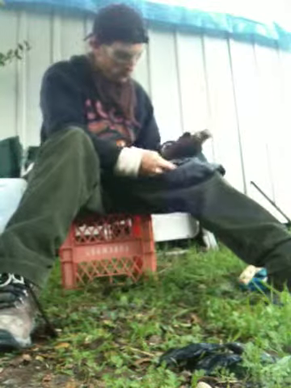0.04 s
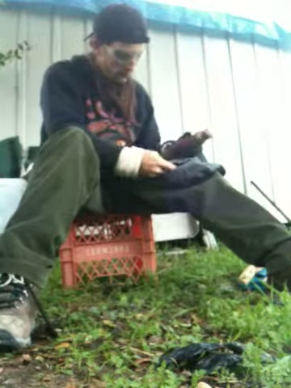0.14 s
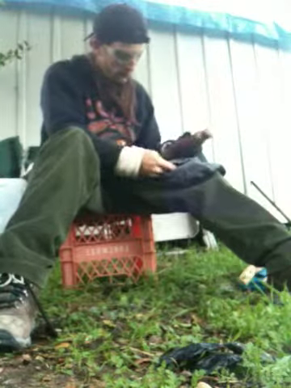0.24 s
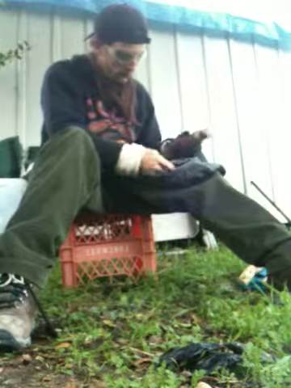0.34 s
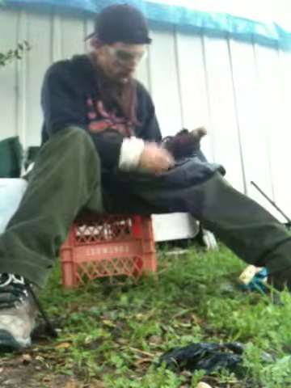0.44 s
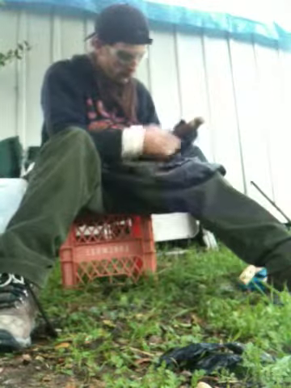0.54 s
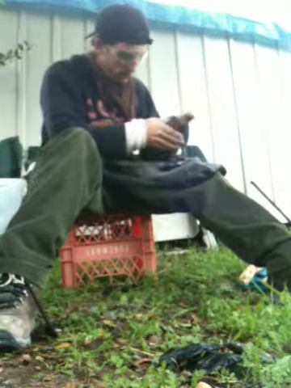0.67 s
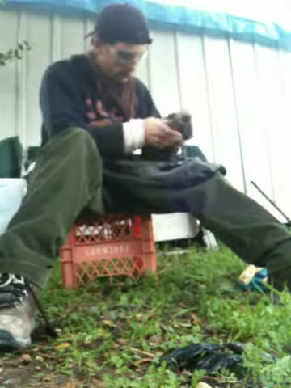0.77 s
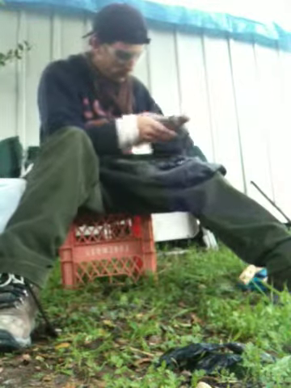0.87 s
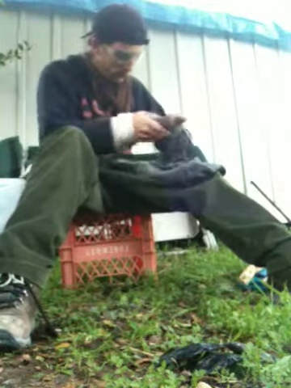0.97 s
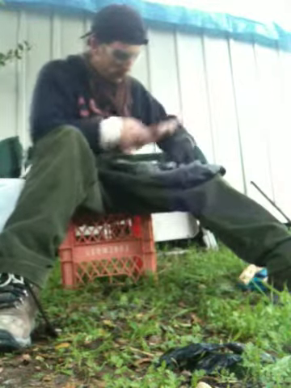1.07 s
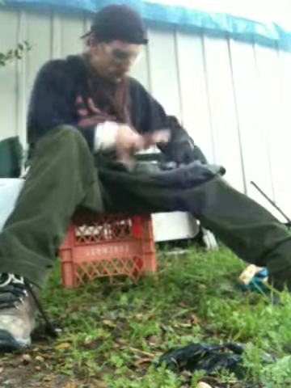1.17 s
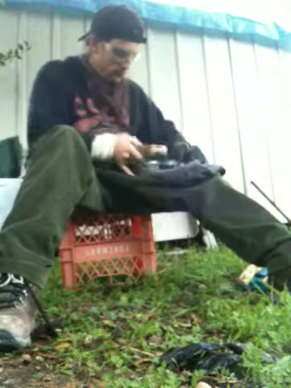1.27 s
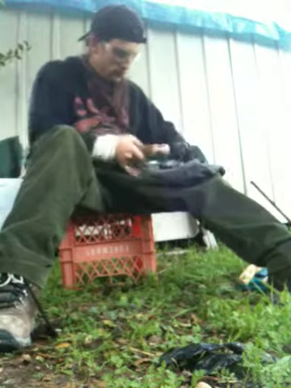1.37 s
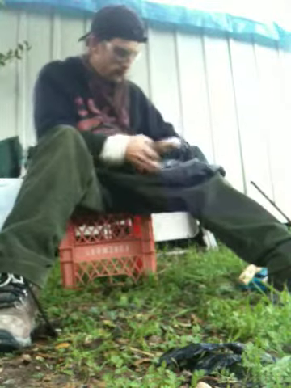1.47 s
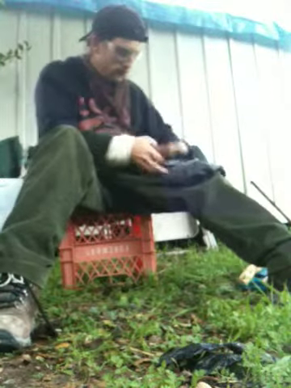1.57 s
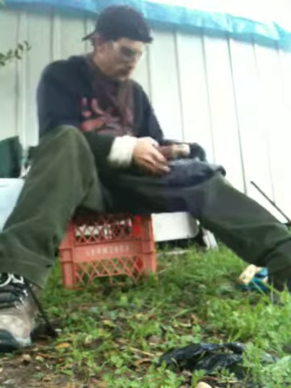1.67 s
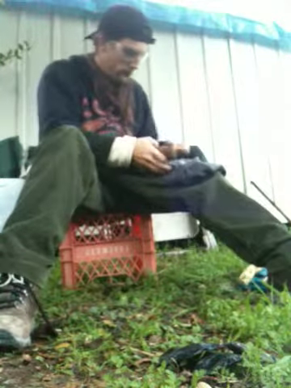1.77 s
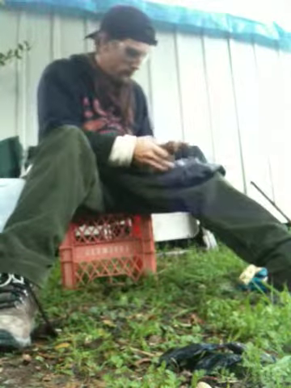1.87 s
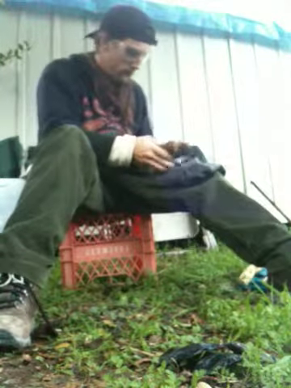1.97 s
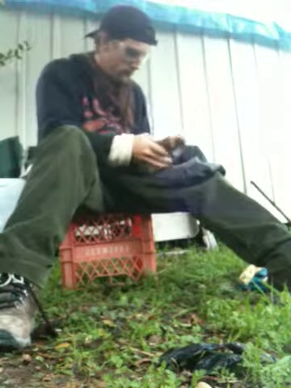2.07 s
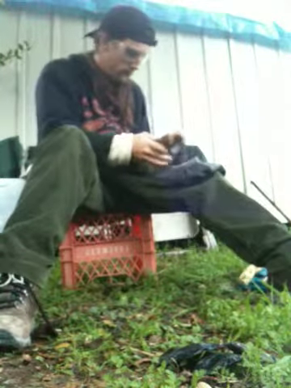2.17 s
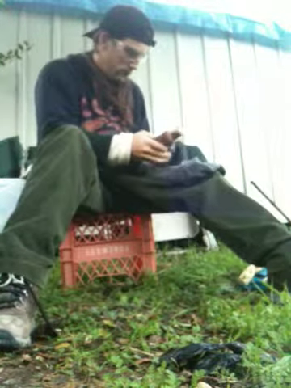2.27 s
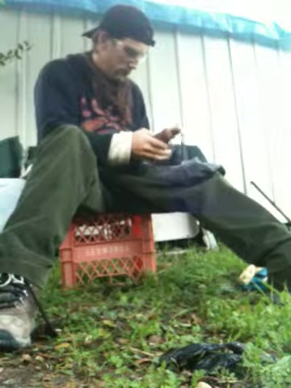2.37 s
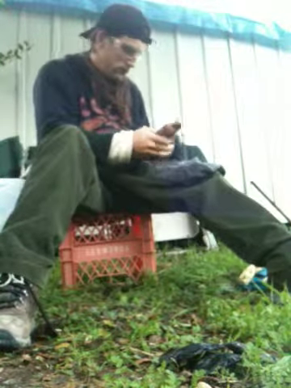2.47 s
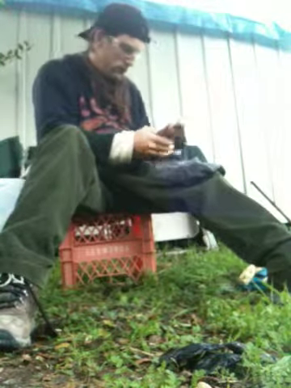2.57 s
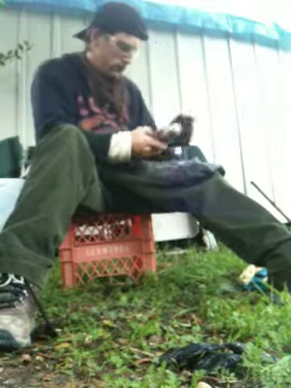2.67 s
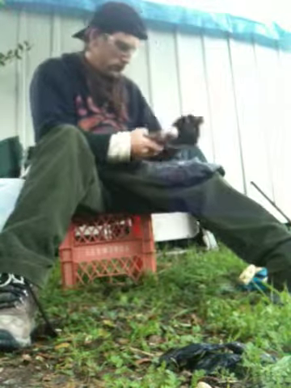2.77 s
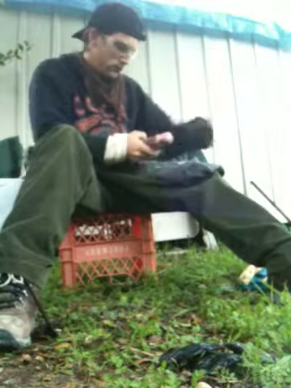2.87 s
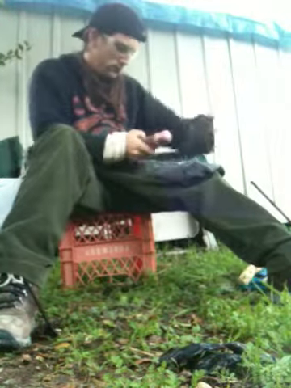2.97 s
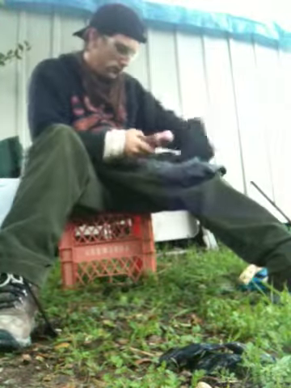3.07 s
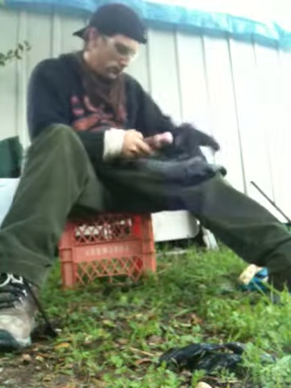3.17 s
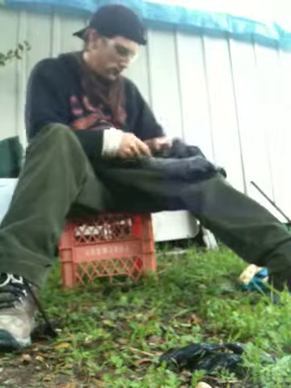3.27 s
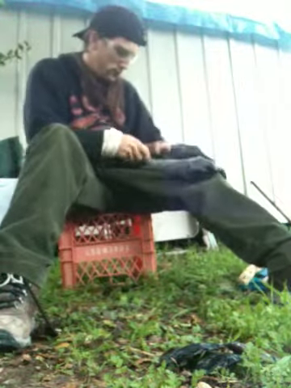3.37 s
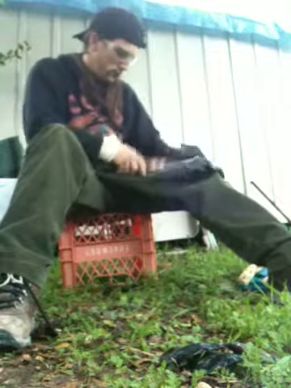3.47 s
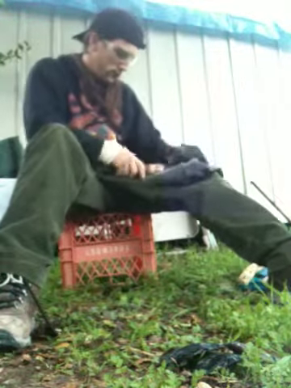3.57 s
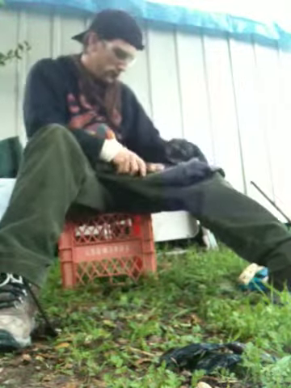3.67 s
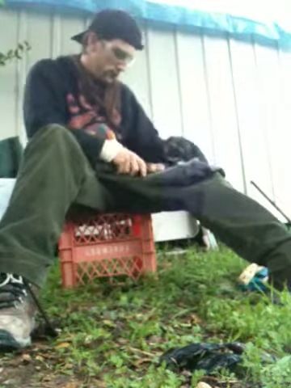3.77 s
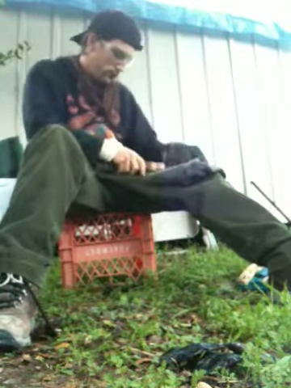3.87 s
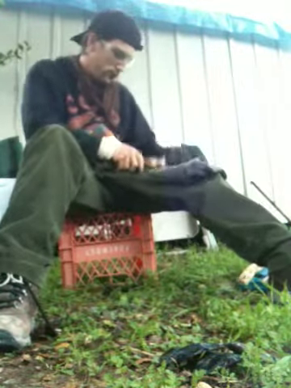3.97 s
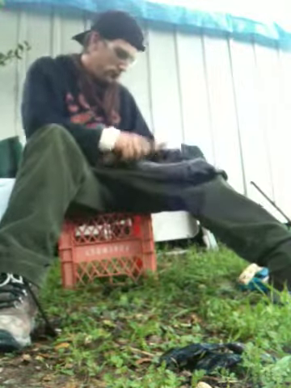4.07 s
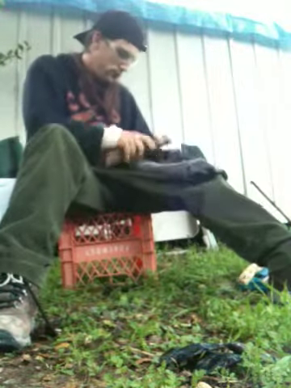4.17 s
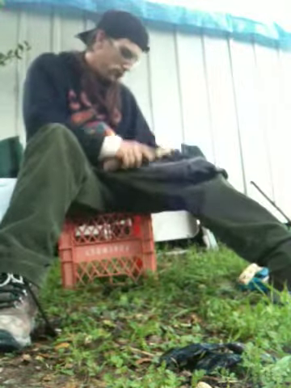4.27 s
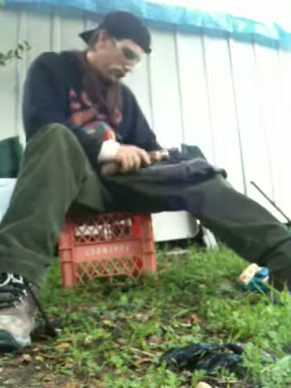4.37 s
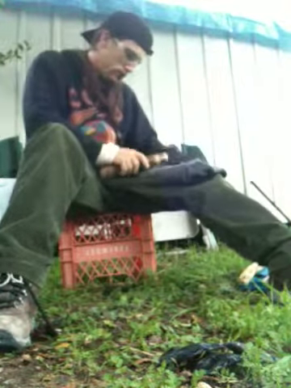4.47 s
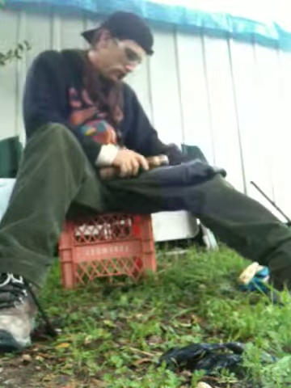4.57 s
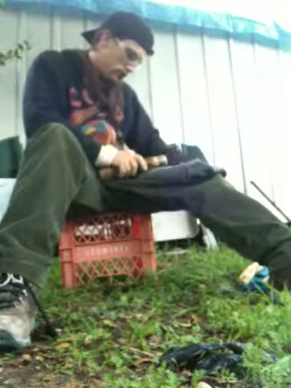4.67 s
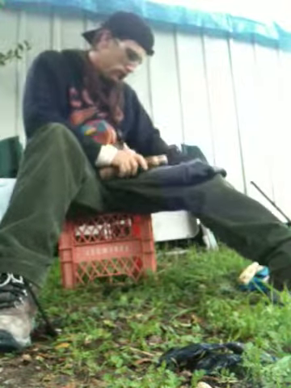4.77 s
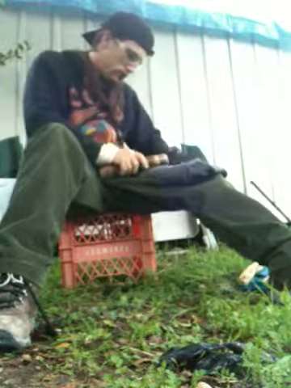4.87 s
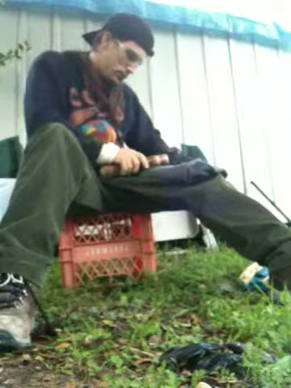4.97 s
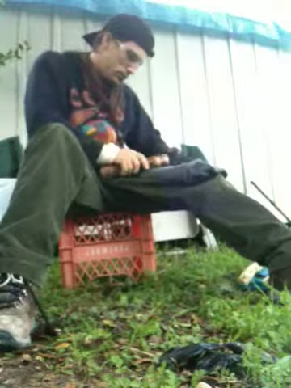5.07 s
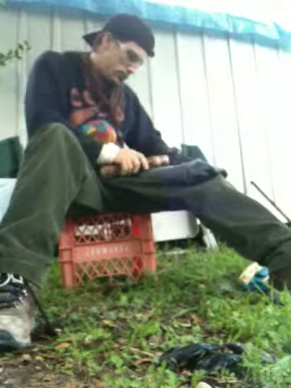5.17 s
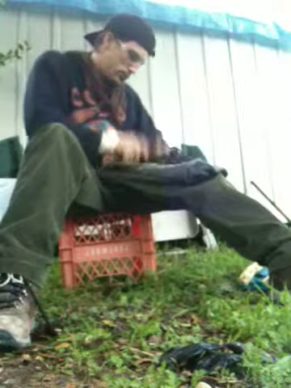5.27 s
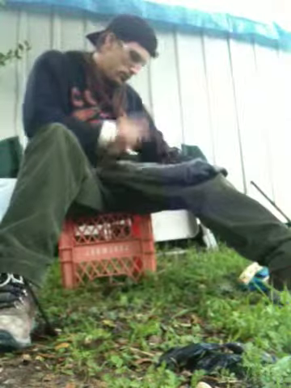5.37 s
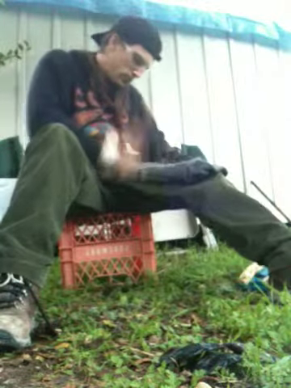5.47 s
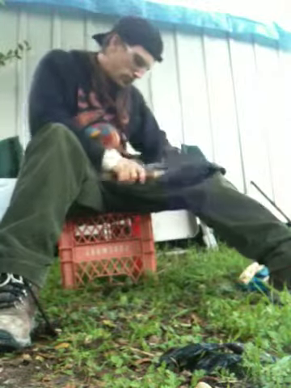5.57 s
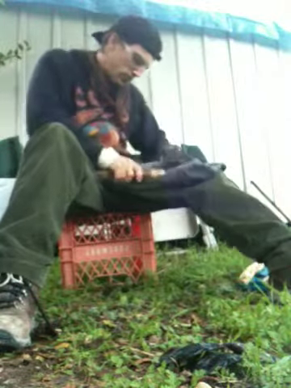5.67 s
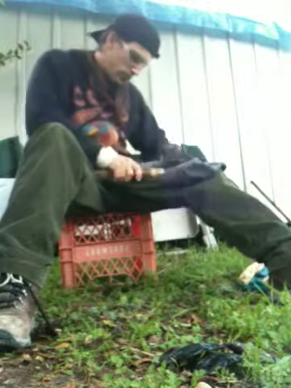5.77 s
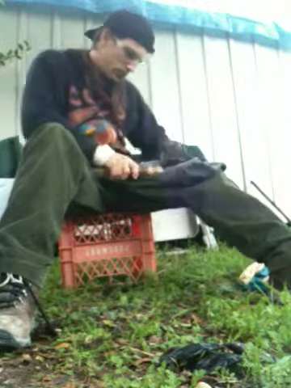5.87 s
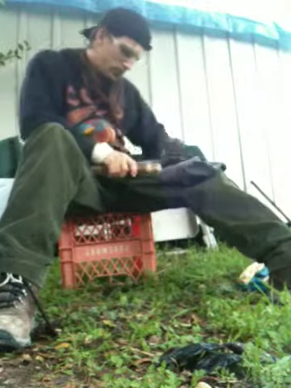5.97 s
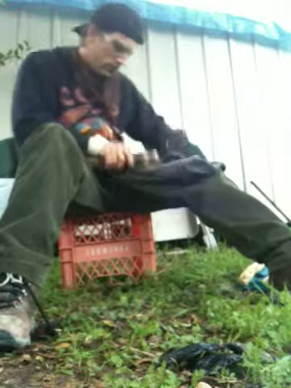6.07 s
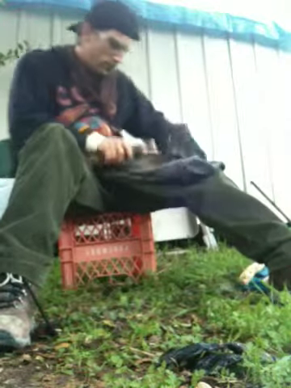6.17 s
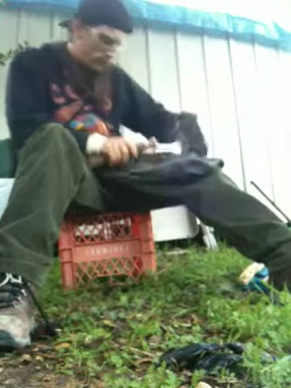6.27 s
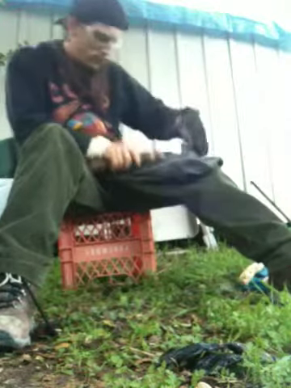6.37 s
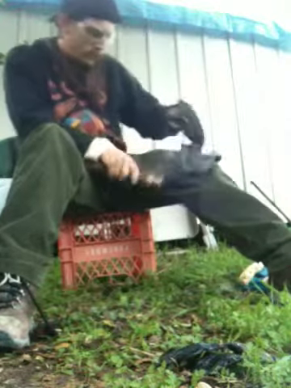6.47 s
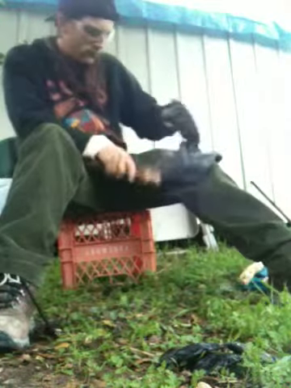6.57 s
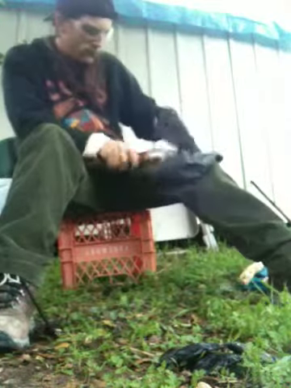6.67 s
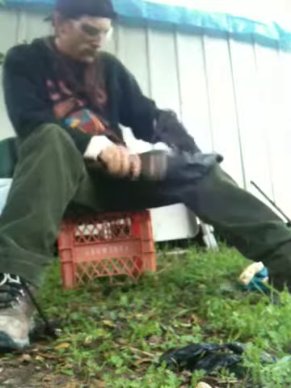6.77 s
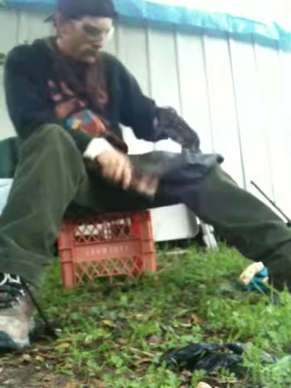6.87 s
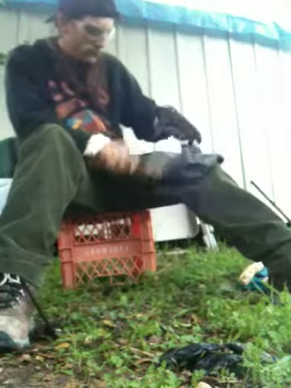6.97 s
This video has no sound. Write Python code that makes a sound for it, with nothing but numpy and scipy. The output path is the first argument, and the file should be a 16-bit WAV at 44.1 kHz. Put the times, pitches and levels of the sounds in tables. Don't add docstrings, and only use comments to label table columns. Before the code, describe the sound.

Sleeves rustle and stone knocks faintly among chirping birds, then a sharp brittle snap sprays grit and a thin bird whistle falls.

```python
import sys
import numpy as np
from scipy import signal
from scipy.fft import rfft, irfft, next_fast_len
from scipy.io import wavfile
from scipy.ndimage import uniform_filter1d

SR = 44100
rng = np.random.default_rng(int(sys.argv[2]) if len(sys.argv) > 2 else 0)


def master(y):
    cut = np.clip(np.atleast_2d(y).T, -1, 1)
    pcm = np.round(cut * 32767)
    wavfile.write(sys.argv[1], SR, pcm.astype(np.int16))


def how_loud(loudness_db):
    steps = np.asarray(loudness_db, float) / 20
    return 10 ** steps


N = 310023
TIME = np.arange(N) / SR


def colour(x, points):
    hz, db = np.transpose(points)
    size = next_fast_len(N)
    log_hz = np.log(np.arange(size // 2 + 1) * SR / size + 1)
    gain = how_loud(np.interp(log_hz, np.log(hz), db, right=-90))
    y = irfft(rfft(x, size) * gain, size)[:N]
    return y / np.std(y)


def walk(rate):
    k = int(SR / rate)
    held = np.repeat(rng.standard_normal(N // k + 1), k)
    return 1.24 * uniform_filter1d(uniform_filter1d(held, k), k)[:N]


def butter(x, order, hz, kind):
    return signal.sosfilt(signal.butter(order, hz, kind, fs=SR, output="sos"), x)


def add(out, s, sound):
    i = int(s * SR)
    out[i:i + len(sound)] += sound[:N - i]


def ring(modes, push_s):
    t = TIME[:int(SR * max(t60 for _, _, t60 in modes))]
    swell = np.clip(t / push_s, 0, 1) ** 2
    return swell * sum(how_loud(db - 60 * t / t60) * np.sin(2 * np.pi * hz * t) for hz, db, t60 in modes)


def echoes(x, t60, wall_s, wall_db):
    t = TIME[:SR // 2]
    tail = rng.standard_normal(len(t)) * how_loud(-60 * t / t60) * np.clip(t / .015, 0, 1)
    tail = tail / np.sqrt(np.sum(tail ** 2))
    tail[int(wall_s * SR)] += how_loud(wall_db)
    return signal.fftconvolve(x, tail)[:N]


def note(length, start_hz, mid_hz, end_hz, orders):
    u = np.linspace(0, 1, int(length * SR))
    hz = np.polyval(np.polyfit([0, .5, 1], [start_hz, mid_hz, end_hz], 2), u)
    phase = 2 * np.pi * np.cumsum(hz) / SR
    return np.sin(np.pi * u) ** 0.47 * sum(how_loud(db) * np.sin(k * phase) for k, db in orders)


def sing(table, orders):
    out = np.zeros(N)
    for s, length, *hz, db in table:
        add(out, s, how_loud(db) * note(length, *hz, orders=orders))
    return out


def glides(table, bow):
    return [(s, length, a, (a + b) / 2 + bow * abs(b - a), b, db) for s, length, a, b, db in table]


def repeats(table, length, start, end):
    return [(s, length, start * hz, hz, end * hz, db) for s, hz, db in table]


def yard():
    # (frequency [Hz], density [dB per Hz])
    rumble = [(18, -78.5), (30, -48), (53, -32), (73, -21), (98, -2.5), (225, -1.5), (257, -2.5), (285, -6),
              (352, -8.5), (434, -13), (1030, -21.5), (4130, -29.5), (7160, -30), (15700, -33)]
    bed = colour(rng.standard_normal(N), rumble)
    low = signal.sosfiltfilt(signal.butter(2, 700, fs=SR, output="sos"), bed)
    low_level = how_loud(0.81 * walk(0.54) + 0.65 * walk(4.4))
    high_level = how_loud(0.44 * walk(3.8))
    return how_loud(-63.5) * (low * low_level + (bed - low) * high_level)


def rustle():
    # (frequency [Hz], density [dB per Hz])
    cloth = [(600, -0.5), (2500, -9), (4000, 3), (6500, 7.5), (9000, -2.5), (12000, 2), (15750, -10.5)]
    # (start [s], held [s], level [dB])
    moves = [(0, .55, -85.5), (.8, .035, -77), (.98, .1, -84), (1.095, .09, -74), (1.22, .9, -82),
             (1.48, .12, -84), (2.33, .04, -79), (2.4, .34, -84), (2.73, .06, -77.5), (2.89, .12, -78),
             (3.11, .17, -75.5), (3.02, 0.066, -85), (3.34, .2, -79), (3.58, .15, -83), (4.21, .08, -78),
             (4.33, .42, -86), (5.0, .08, -89), (5.485, .012, -76.5), (5.54, .005, -82), (5.92, .04, -72),
             (6.0, .08, -80), (6.12, .38, -83), (6.503, .08, -70), (6.6, .09, -75.5), (6.868, .02, -73.5),
             (6.9, .07, -89), (6.979, .06, -71)]
    rise_db_s, fall_db_s = 500, 200
    level = np.zeros(N)
    for s, held, db in moves:
        before = np.clip(s - TIME, 0, 1)
        after = np.clip(TIME - s - held, 0, 1)
        level += how_loud(db - rise_db_s * before - fall_db_s * after)
    grains = rng.standard_normal(N) * how_loud(2.2 * walk(500))
    return how_loud(6.5) * level * colour(grains, cloth)


def hoarse_birds():
    # (time [s], middle pitch [Hz], level [dB])
    chatter = [(.08, 6270, -72), (.14, 6800, -72), (.18, 7100, -71), (.325, 6350, -69.5), (.43, 6540, -68),
               (.545, 6360, -71), (1.012, 6550, -70), (1.055, 6900, -71), (1.08, 7300, -76),
               (1.335, 7040, -66.5), (1.435, 7280, -66)]
    # (time [s], length [s], start pitch [Hz], end pitch [Hz], level [dB])
    scolds = [(3.855, 0.12, 6750, 6620, -61), (3.82, 0.16, 4630, 4780, -74), (3.85, 0.059, 9100, 8900, -74),
              (3.87, 0.1, 5900, 5620, -71), (3.985, 0.048, 4660, 5050, -63.5),
              (4.035, 0.043, 7650, 7050, -63.5), (4.003, 0.033, 5560, 6150, -57),
              (4.03, .13, 6320, 5620, -66.5), (4.04, 0.1, 5310, 5110, -74),
              (4.05, 0.118, 4750, 4900, -69.5), (4.07, 0.13, 7230, 6660, -75),
              (4.17, 0.14, 5600, 6000, -78), (4.22, .1, 6550, 7700, -81)]
    notes = glides(scolds, bow=0.048) + repeats(chatter, length=.022, start=.85, end=1.15)
    return sing(notes, orders=[(1, 3)]) * (.4 + walk(1400))


def pad_knocks():
    # (time [s], level [dB], centre frequency [Hz], t60 [s])
    knocks = [(.29, -59.5, 1750, 0.046), (.295, -63, 780, 0.047), (.38, -61, 1600, 0.035),
              (0.436, -64, 640, 0.08), (.48, -64, 1650, .04), (.70, -65, 800, 0.07),
              (1.55, -60, 560, 0.057)]
    out = np.zeros(N)
    for s, db, hz, t60 in knocks:
        modes = [(hz * k, 0, 1.6 * t60) for k in rng.uniform(.7, 1.35, size=8)]
        add(out, s, how_loud(db - 6) * ring(modes, push_s=.008))
    return out


def small_birds():
    # (time [s], length [s], start pitch [Hz], end pitch [Hz], level [dB])
    chirps = [(.58, .14, 12900, 10900, -85), (1.974, 0.04, 6200, 5150, -65), (1.99, .035, 6800, 6200, -74),
              (3.795, .035, 6950, 7850, -73.5), (3.826, 0.05, 5650, 7100, -55),
              (4.005, .036, 5400, 7900, -58), (4.28, .04, 7500, 7600, -77), (5.475, 0.032, 4470, 6800, -83),
              (6.275, 0.048, 6800, 6400, -61.5)]
    # (time [s], length [s], start pitch [Hz], end pitch [Hz], level [dB])
    swoops = [(2.187, .072, 7370, 6220, -59)]
    # (time [s], lowest pitch [Hz], level [dB])
    dips = [
        (2.21, 7200, -51.5),
        (2.22, 7910, -59.5),
    ]
    notes = glides(chirps, bow=-.08) + glides(swoops, bow=-.4)
    notes += repeats(dips, length=.065, start=1.21, end=1.15)
    return sing(notes, orders=[(1, 3)]) * (.8 + .6 * walk(600))


def tip_touches():
    # (frequency [Hz], level [dB], t60 [s])
    tip = [(7345, -2, 0.2), (10150, -22.5, .15), (14290, -9, 0.13), (14475, -10.5, 0.16), (14600, -15, .11)]
    # (time [s], level [dB], brightness of the modes above 9 kHz [dB])
    touches = [(1.17, -62, -8), (5.30, -70, -6), (5.624, -40, 0), (5.677, -40, -1), (5.7694, -38, -4.5),
               (5.794, -40.5, -14), (5.94, -68, 13), (5.956, -60, 8), (6.01, -74.5, 3.5), (6.509, -50, 6),
               (6.556, -66, 18), (6.616, -55.5, 12.5), (6.651, -60, 8), (6.671, -57, 10),
               (6.733, -54.5, -11.5), (6.956, -76, 3)]
    out = np.zeros(N)
    for s, db, bright_db in touches:
        modes = [(hz, d + bright_db * (hz > 9000), t60) for hz, d, t60 in tip]
        add(out, s, how_loud(db) * ring(modes, push_s=.002))
    return out


def crow():
    # (time [s], top pitch [Hz], level [dB])
    caws = [(1.62, 632, -67.5), (2.025, 644, -66.5), (2.55, 628, -67.5), (3.105, 616, -66.5)]
    # (multiple of the pitch, level [dB])
    caw_orders = [(2, 0), (3, 0)]
    # (low edge [Hz], high edge [Hz])
    throat_hz = (1240, 2200)
    voice = sing(repeats(caws, length=.13, start=0.69, end=0.61), caw_orders)
    return butter(voice * (1.09 + .5 * walk(250)), 3, throat_hz, "bandpass")


def near_caller():
    # (time [s], length [s], top pitch [Hz], level [dB])
    arch_table = [(2.779, 0.049, 3735, -61.5), (2.921, 0.053, 3500, -66), (3.993, .088, 3420, -74)]
    # (time [s], length [s], start pitch [Hz], end pitch [Hz], level [dB])
    calls = [(3.835, 0.051, 2800, 2200, -77), (4.07, 0.072, 3420, 3350, -74),
             (5.555, .04, 5160, 4930, -68.5)]
    arches = [(s, length, .68 * hz, hz, .62 * hz, db) for s, length, hz, db in arch_table]
    return sing(glides(calls, bow=.2) + arches, orders=[(1, 3)]) * (.9 + .4 * walk(500))


def blows():
    # (time [s], stone level [dB], handle level [dB], pad level [dB])
    contacts = [(4.6188, -42.5, -42.5, -64), (5.151, -77, -55.5, -78), (5.6149, -46.5, -47, -49.5),
                (5.6192, -49.5, -50.5, -42.5), (5.661, -40, -54, -65), (6.544, -73.5, -68.5, -64),
                (6.9815, -56, -56, -59.5)]
    crack = (5.6223, -2, -22, -31)
    # (frequency [Hz], level [dB], t60 [s])
    core = [(1650, -18, .014), (2930, -14, .014), (3700, -1, .018), (4050, -6, .012), (4500, 1, .011),
            (5130, -1, .012), (5950, -12, .01), (6850, -8, .011), (8450, -7, .010), (10900, -12, .008),
            (11800, -4, .010), (12500, -11, .009), (14300, -15, .011), (15200, -19, .009)]
    # (frequency [Hz], level [dB], t60 [s])
    billet = [(966, -7, 0.038), (1028, 3.5, 0.033), (1645, -11.5, 0.017), (2370, -20, 0.01)]
    # (frequency [Hz], level [dB], t60 [s])
    pad = [(196, 1, 0.077), (271, -2, 0.062), (367, -4.5, 0.055), (532, 5.5, 0.044), (780, 3, 0.044)]
    # (frequency [Hz], level [dB], t60 [s])
    snap = [(3300, -14, .008), (4400, -4.5, .007), (11800, -15, .005), (14300, -24, .006)]
    soft_dull = .25
    out = np.zeros(N)
    for s, stone_db, handle_db, pad_db in contacts + [crack]:
        stone = [(hz, db + soft_dull * stone_db * (hz > 6500), t60) for hz, db, t60 in core]
        add(out, s, how_loud(stone_db - 8) * ring(stone, push_s=.0009))
        add(out, s, how_loud(handle_db) * ring(billet, push_s=0.0047))
        add(out, s, how_loud(pad_db) * ring(pad, push_s=0.0023))
    add(out, 5.62274, ring(snap, push_s=.0004))
    return out


def grit_fall():
    # (frequency [Hz], density [dB per Hz])
    grit_points = [(590, -45), (1000, -9), (1570, -26), (3590, -8.5), (7510, -1.5), (12300, -11.5),
                   (13200, -27.5), (14800, -18), (15700, -37.5)]
    # (time [s], level [dB], t60 [s])
    bursts = [(5.596, -58, 0.46), (5.6184, -41, .2), (5.6225, -21, 0.082), (5.764, -51, 0.053),
              (6.506, -56, .08), (6.981, -54, 0.05)]
    fall = sum((TIME > s) * how_loud(db - 60 * np.abs(TIME - s) / t60) for s, db, t60 in bursts)
    patter = walk(800)
    grit = colour(rng.standard_normal(N) * how_loud(1.6 * patter), grit_points)
    start, stop = 5.64, 5.82
    trickle_db = -48 - 60.5 * (TIME - start) - 250 * np.clip(TIME - stop, 0, 1)
    heaps = how_loud(2.5 * uniform_filter1d(patter, size=300))
    trickle = (TIME > start) * how_loud(trickle_db) * heaps
    dust = butter(grit, 1, 7500, "lowpass")
    return fall * grit + trickle * dust


def shards():
    # (time [s], level [dB], frequency [Hz])
    loose = [(5.6239, -18, 3720), (5.6247, -13.5, 6500), (5.6283, -14, 6100), (5.631, -25.5, 6200),
             (5.636, -20.5, 7600), (5.637, -14.5, 5900), (5.636, -25, 12000), (5.6402, -16, 6180),
             (5.644, -23, 4760), (5.647, -25, 10200), (5.650, -22, 7600), (5.653, -21.5, 7700),
             (5.661, -22.5, 8000)]
    # (time [s], level [dB], frequency [Hz])
    landings = [(5.682, -40, 4570), (5.768, -46, 5340), (5.9566, -52, 5500), (5.99, -62.5, 5000),
                (6.51, -52, 10500), (6.62, -46, 12000), (6.679, -48, 8620), (6.873, -56.5, 11500),
                (6.9815, -47, 11000), (7.024, -57, 5900)]
    out = np.zeros(N)
    for pieces, t60 in [(loose, .014), (landings, .024)]:
        for s, db, hz in pieces:
            modes = [(hz, -3, t60), (0.89 * hz, -7, 0.7 * t60), (0.61 * hz, -14, .5 * t60)]
            add(out, s, how_loud(db) * ring(modes, push_s=0.00037))
    return out


def whistler():
    # (time [s], pitch [Hz], level [dB])
    contour = [(6.27, 6373, -71), (6.338, 5974, -56), (6.452, 5462, -61), (6.62, 4993, -58.5),
               (6.744, 4986, -51.5), (6.802, 4963, -66), (6.838, 4919, -54), (6.96, 4891, -63.5),
               (7.03, 4727, -56)]
    s, hz, db = np.transpose(contour)
    phase = 2 * np.pi * np.cumsum(np.interp(TIME, s, hz)) / SR
    return how_loud(2.5 + np.interp(TIME, s, db, left=-140) + 3.0 * walk(90)) * np.sin(phase)


def birds():
    small = hoarse_birds() + small_birds()
    callers = crow() + near_caller()
    whistle = whistler()
    hedge = how_loud(-2) * echoes(small, t60=0.31, wall_s=0.11, wall_db=-19)
    far = how_loud(-7) * echoes(how_loud(-6) * callers + whistle, t60=.35, wall_s=.045, wall_db=-15)
    return small + callers + whistle + hedge + far


def stone_work():
    work = pad_knocks() + tip_touches() + blows() + grit_fall() + shards()
    work = butter(work, 2, 120, "highpass")
    bright = butter(work, 1, 1400, "highpass")
    return work + how_loud(-20.5) * echoes(bright, t60=0.19, wall_s=0.0083, wall_db=-7.5)


def scene():
    return (yard() + rustle() + birds() + stone_work())[None]


def thin_treble(x, margin_db, from_hz):
    hz, _, z = signal.stft(x, SR, nperseg=2048, noverlap=1024)
    power = np.abs(z[:1024].reshape(64, 16, -1)) ** 2 + 1e-18
    band_db = 10 * np.log10(power.sum(axis=1, keepdims=True))
    band_hz = hz[:1024:16, None, None]
    masker_db = np.maximum.accumulate(np.where(band_hz > 4400, band_db, -200), axis=0)
    margin_db = margin_db + 20 * (masker_db > -44)
    floor_db = masker_db - margin_db + 2.5 * rng.standard_normal(band_db.shape)
    keep = (10 * np.log10(power) > floor_db) | (band_hz < from_hz)
    z[:1024] *= np.where(keep, 1, how_loud(-30)).reshape(1024, -1)
    return signal.istft(z, SR, nperseg=2048, noverlap=1024)[1][:N]


def top_cut(x):
    return signal.sosfilt(signal.butter(12, 16830, fs=SR, output="sos"), x)


def record(dry):
    # (start [s], end [s])
    gap = (5.6102, 5.6157)
    rounded = .8 * np.tanh(dry[0] / .8)
    limited = signal.sosfilt(signal.ellip(8, .2, 70, 16700, fs=SR, output="sos"), rounded)
    thin = thin_treble(limited, margin_db=38, from_hz=7600)
    gate = np.where((TIME > gap[0]) & (TIME < gap[1]), how_loud(-40), 1)
    mix = thin * uniform_filter1d(gate, size=40)
    return top_cut(mix[None])


dry = scene()
out = record(dry)
master(out)
```